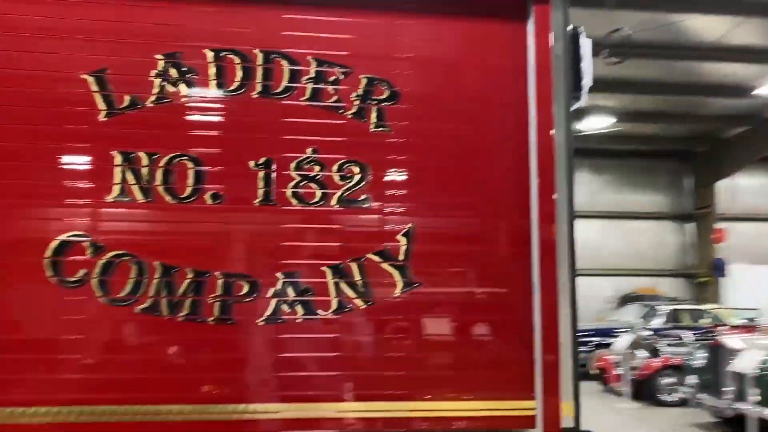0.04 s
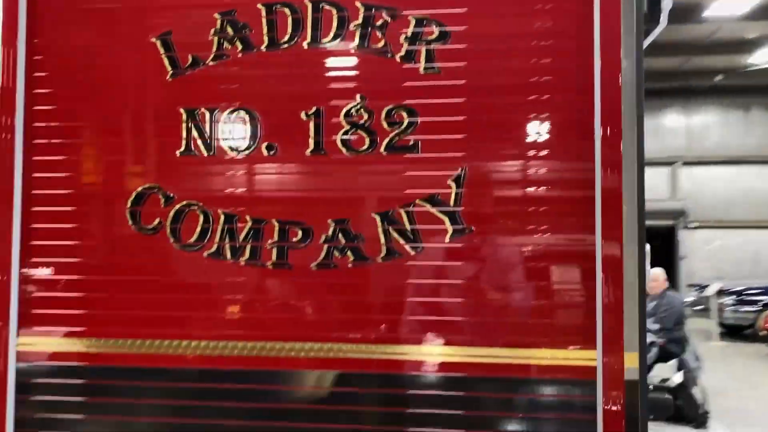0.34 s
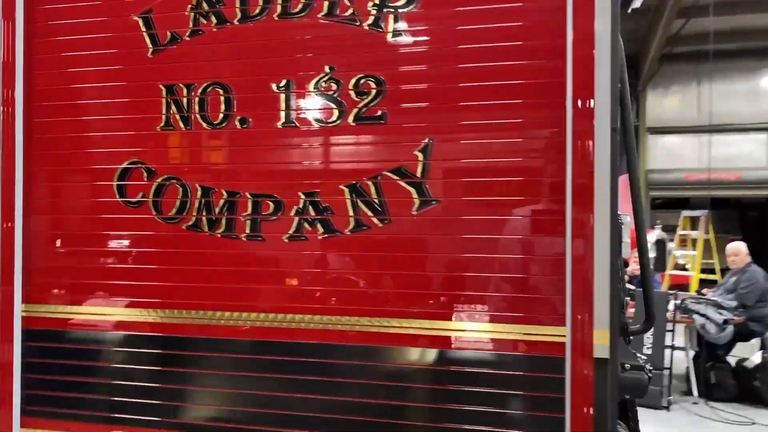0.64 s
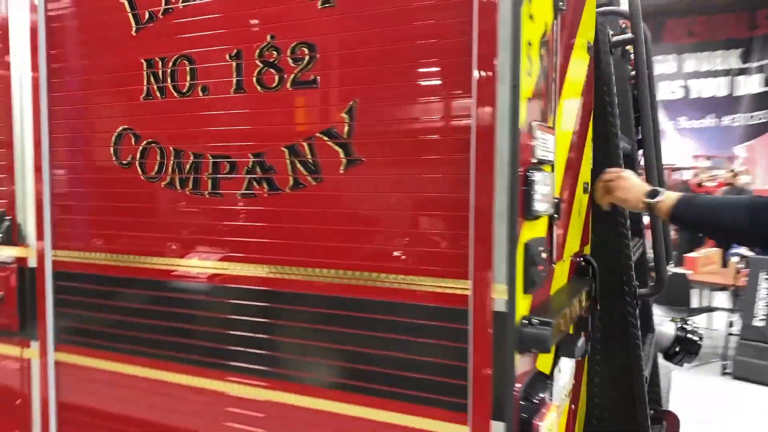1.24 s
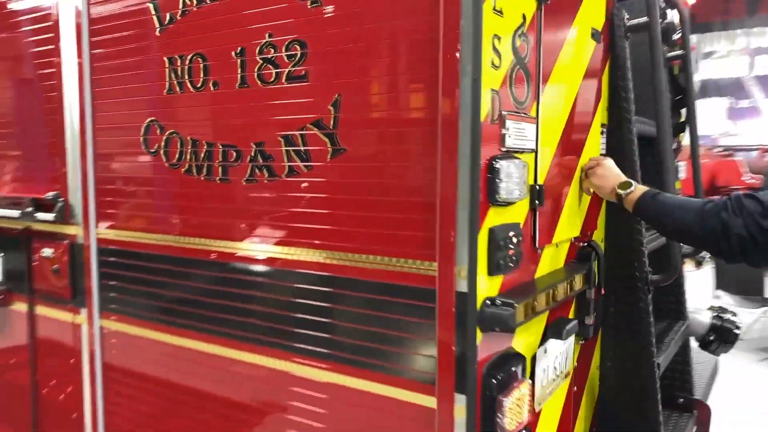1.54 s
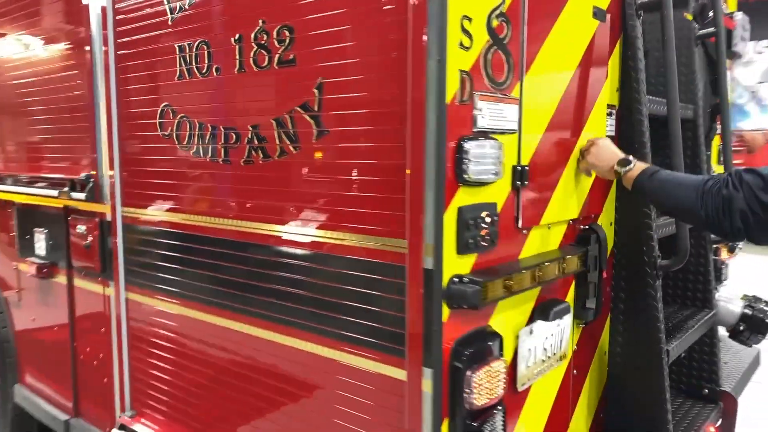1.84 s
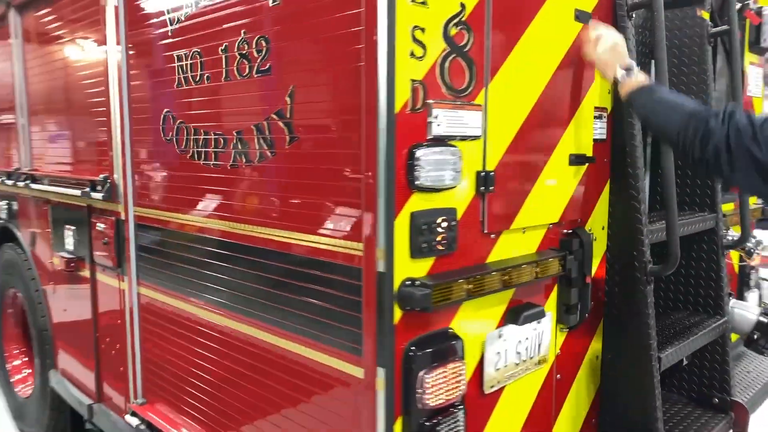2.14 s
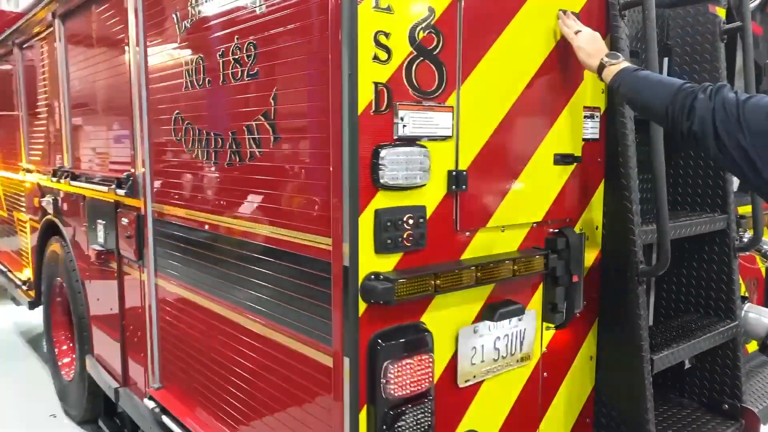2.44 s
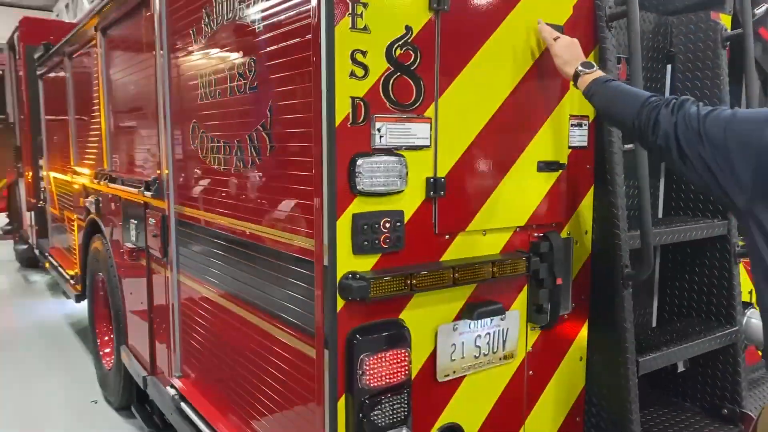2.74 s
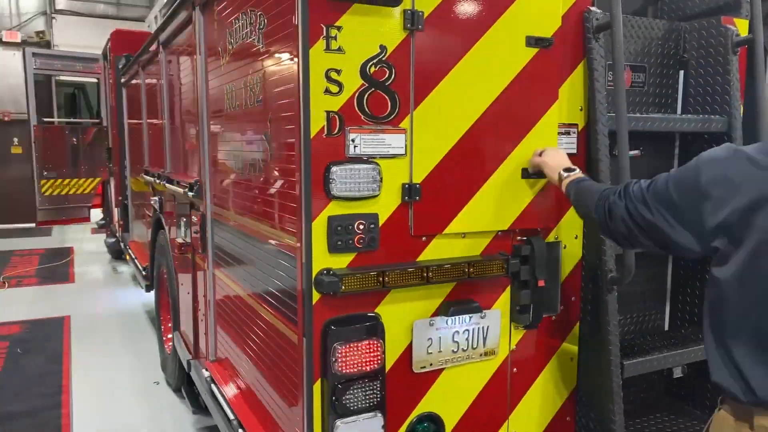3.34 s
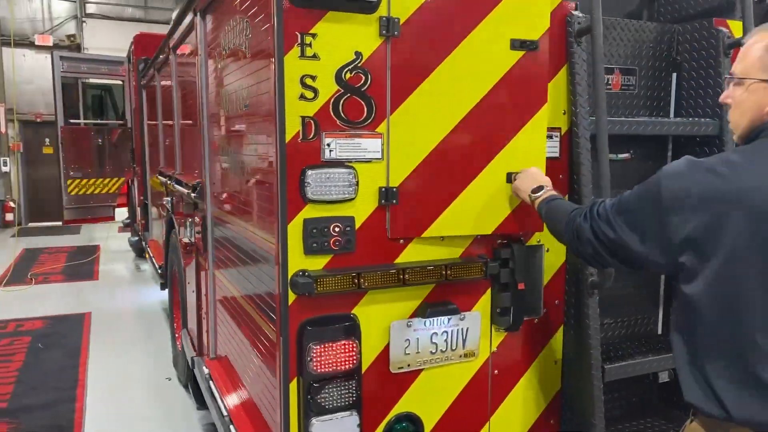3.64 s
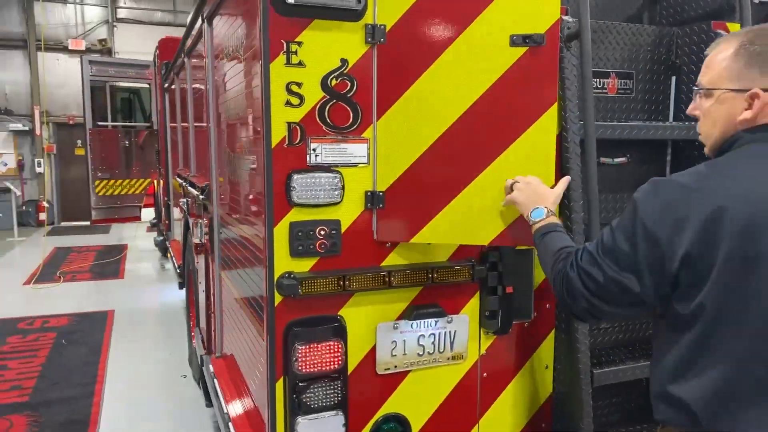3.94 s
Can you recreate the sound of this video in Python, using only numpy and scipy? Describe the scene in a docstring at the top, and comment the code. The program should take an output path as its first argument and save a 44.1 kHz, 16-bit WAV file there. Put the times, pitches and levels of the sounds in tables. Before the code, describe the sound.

Loud, close metal clacks ring through a large garage as a hand springs two truck door latches, one after the other. The freed door gives a low boom, then the handle is knocked over a low drone and ventilation hum.

```python
"""Ventilation, a low hum and a soft rustle fill a large garage, and something bumps the bodywork.
A hand works the two heavy latches of a truck's sheet-metal compartment door: each clicks, springs open
with a clack and rebounds, ringing the metal around it. The freed door booms, a low drone swells,
and the hand knocks on the lower latch's handle.
The hall rings on after each blow, and the loudest clacks overload the close microphone."""
import sys
import numpy as np
from scipy import signal
from scipy.fft import rfft, irfft
from scipy.io import wavfile
from scipy.ndimage import uniform_filter1d

SR = 44100
rng = np.random.default_rng(int(sys.argv[2]) if len(sys.argv) > 2 else 0)


def output_pcm(signal):
    """Save a mono or channel-first signal as 16-bit PCM at the path in sys.argv[1].

    Samples are clipped to [-1, 1] before scaling.
    """
    pcm = np.clip(np.atleast_2d(signal).T, -1, 1) * 32767
    wavfile.write(sys.argv[1], SR, np.round(pcm).astype(np.int16))


N = 176400
T = np.arange(N) / SR

# blows on the two latches and the handle
# (time [s], level [dB], treble tilt [dB/octave], low thump [dB], rise [ms], crack t60 at 2 kHz [s])
LOWER_HITS = [(1.7228, -2, 1.5, -1.5, 4, 0.032), (1.7642, 3.5, 1.4, 1.5, 0.64, 0.016),
              (1.8212, -4, -.5, -5.5, 2.8, 0.048)]
UPPER_HITS = [(2.9280, -7, 1.5, 4.5, 1.04, 0.026), (2.9688, 2, 0.21, -2.5, 0.27, 0.054),
              (3.0105, -11.5, 1.1667, 4.5, .5, 0.063), (3.1050, -13.5, 2.04, -8, 0.72, .04)]
HANDLE_HITS = [(3.466, -43.5, -1.6, 8.5, 5, 0.053), (3.557, -35, -0.37, 9, 2.4, 0.077),
               (3.5715, -17.5, 0.25, -1, 2.1, 0.048), (3.591, -33, 1, -17, 1.5, 0.07)]
# ringing tones of each part, plus a faint, very high 14.7 kHz tone on each latch blow
# (frequency [Hz], level [dB], t60 [s])
LOWER_TONES = [(178.2, -16.5, 0.37), (531, -23.5, 0.25), (719, -21, 0.22), (1060, -18, .15),
               (1560, -17, 0.06), (2135, -44.5, 0.21), (2430, -7, .05), (2794, -14, 0.077),
               (2760, -10, 0.12), (2980, -15, 0.06), (4260, -27, 0.17), (8150, -17, 0.11),
               (14700, -39, .13)]
UPPER_TONES = [(166.6, -17, 0.23), (239.7, -20.5, 0.42), (385.4, -16.5, 0.29), (599, -16.5, 0.17),
               (1087, -17, 0.25), (1606, -16.5, 0.24), (2390, -13, 0.047), (2660, -18, 0.059),
               (2716, -13.5, .11), (3150, -19, 0.34), (3464, -13.5, .06), (5470, -10.5, 0.053),
               (8130, -32, 0.27), (14700, -38, .15)]
HANDLE_TONES = [(164, -12.5, 0.31), (354, -18.5, 0.27), (610, -9, 0.086), (794, -10, 0.063),
                (2005, 4, 0.057), (4280, -28, 0.21)]
# clatter of the metal around each part (frequency [Hz], spectral level [dB])
LOWER_COLOUR = [(60, -16.5), (180, -10), (350, -10), (600, -8), (1100, -7.5), (1700, -8.5), (2100, 2),
                (2900, -1.5), (3800, -14.5), (6000, -16), (8300, -17.5), (10000, -35.5), (13000, -37),
                (14700, -26), (16000, -49)]
UPPER_COLOUR = [(60, -20.5), (180, -12), (400, -6.5), (700, -4), (1100, -2.5), (1800, -5.5), (2500, 3),
                (3400, -1), (4400, -16), (5800, -8), (8600, -6.5), (10200, -30), (13000, -28.5),
                (14500, -20), (16000, -34)]
HANDLE_COLOUR = [(100, -0.5), (450, -13), (800, 5), (1200, -9.5), (2100, 3), (3400, -6), (4700, -25),
                 (8000, -27), (11000, -54), (16000, -45)]
# soft bumps on the bodywork (time [s], level [dB], panel mode [Hz])
BUMPS = [(1.03, -30, 236), (1.113, -47, 940), (2.664, -29, 656)]
# the hall's reverb send (frequency [Hz], level [dB])
HALL_SEND = [(100, -14), (200, -10), (400, -13.5), (800, -14.5), (1400, -14), (2000, -13.5), (2700, -10),
             (4200, -9), (6000, -14), (8500, -20.5), (14000, -21.5)]
# the hall's tail (frequency [Hz], t60 [s])
HALL_T60 = [(100, 2.4), (500, 0.89), (1400, 0.87), (2700, 0.98), (5000, 0.93), (8000, 0.77), (14000, 0.2)]
# tone of the noise beds (frequency [Hz], spectral level [dB])
AIR_COLOUR = [(20, -30), (30, -8), (40, -4.5), (54, 5), (72, -0.5), (92, -6), (133, -6.5), (150, -12),
              (245, -13.5), (490, -25.5), (770, -29.5), (1540, -28), (5000, -40.5), (12100, -47),
              (14000, -37), (15500, -39.5)]
RUSTLE_COLOUR = [(200, -20), (700, 7), (1600, 5.5), (3500, 0), (8000, -7.5), (14000, -21)]
# fader rides of the background layers (time [s], level [dB])
RUSTLE_LEVEL = [(0, -48.5), (.12, -50.5), (.26, -55.5), (.35, -50), (.46, -58), (.6, -49), (.76, -50.5),
                (1.1, -56), (1.35, -56.5), (1.5, -50), (1.7, -70), (3.5, -60.5), (3.8, -53.5), (4, -56.5)]
MAINS_LEVEL = [(0, -46.5), (1.2, -43.5), (2.8, -48.5), (3.6, -50), (4, -50.5)]
DRONE_LEVEL = [(0, -64), (2.9, -57), (3.1, -30), (3.28, -30), (4, -28)]
# the drone's partials (frequency ratio [1], level [dB])
DRONE_PARTIALS = [(1, -2), (1.74, -10), (4, -21)]


def latch(hits, tones, colour, tones_db=-2, panel_db=-11, panel_t60_s=0.17):
    """Each blow is a short crack, the panel's dense ring and a set of ringing tones."""
    out, t, f = np.zeros(N), T[:SR // 2], freqs(SR)
    for start, db, tilt_db, thump_db, rise_ms, crack_t60 in hits:
        ring = 0
        for hz, tone_db, t60 in tones:
            ring += undb(tone_db + tones_db) * np.sin(2 * np.pi * (hz * t + rng.random())) * fade(t, t60)
        for hz, band in bands(noise(colour, len(t))):
            decay_scale = (2000 / hz) ** 0.33  # treble dies sooner
            crack = fade(t, crack_t60 * decay_scale)
            panel = undb(panel_db) * fade(t, panel_t60_s * decay_scale)
            ring += band * (crack + panel)
        eq_db = tilt_db * np.log2(np.clip(f, 500, 9000) / 2500) + thump_db / (1 + (f / 450) ** 2)
        clack = irfft(rfft(ring, SR) * undb(eq_db), SR)[:len(t)]
        attack = np.minimum(t / (rise_ms / 1000), 1)
        add(out, start, undb(db) * attack * clack)
    return out


def door_boom(start_s=2.94, hz=63, db=-20.5, t60_s=2.1, rise_s=0.02):
    """The freed door swings in its lowest mode."""
    out = np.zeros(N)
    envelope = fade(T, t60_s) * np.minimum(T / rise_s, 1)
    add(out, start_s, undb(db) * np.sin(2 * np.pi * hz * T) * envelope)
    return out


def bumps(t60_s=0.089, rise_s=0.0032, tone_db=-3):
    """Dull, short contacts with the bodywork: a thud around one panel mode."""
    out, t = np.zeros(N), T[:SR // 4]
    for start, db, hz in BUMPS:
        colour = [(hz / 4, -16), (hz / 1.4, -11), (hz, 0), (hz * 1.1, -10),
                  (hz * 2, -14), (hz * 4, -32), (hz * 20, -60)]
        thud = noise(colour, len(t)) / 2 + undb(tone_db) * np.sin(2 * np.pi * hz * t)
        add(out, start, undb(db) * thud * fade(t, t60_s) * np.minimum(t / rise_s, 1))
    return out


def hall(x, build_s=0.02, far_wall_s=0.147, far_wall_db=-2):
    """The hall stores each band's energy and lets it go as a wash, with a slap off the far wall."""
    t = T[:SR * 3 // 2]
    slap = undb(far_wall_db) * (t > far_wall_s) * fade(abs(t - far_wall_s), t60=0.087)
    swell = np.minimum(t / build_s, 1) * (1 + slap)
    out = 0
    for (hz, band), (_, wash) in zip(bands(x), bands(rng.standard_normal(N))):
        decay = (swell * fade(t, lookup(HALL_T60, hz))) ** 2
        energy = np.abs(signal.fftconvolve(band ** 2, decay / decay.sum())[:N])
        out += undb(lookup(HALL_SEND, hz)) * np.sqrt(energy) * wash / wash.std()
    return out


def drone(hz=48.1, drift=0.00748, waver_db=3.5):
    """A low, wavering drone that swells after the second latch."""
    phase = 2 * np.pi * np.cumsum(hz * (1 + drift * wander(5))) / SR
    tone = sum(undb(db + waver_db * wander(9)) * np.sin(ratio * phase) for ratio, db in DRONE_PARTIALS)
    return np.sqrt(2) * fader(DRONE_LEVEL) * tone


def ventilation(db=-39.5):
    """A steady bed of ventilation rumble, with microphone hiss on top."""
    return undb(db) * noise(AIR_COLOUR, N)


def mains_hum(hz=117.5, waver_db=3.5):
    """Mains hum: one low tone whose level wavers."""
    return np.sqrt(2) * fader(MAINS_LEVEL) * np.sin(2 * np.pi * hz * T) * undb(waver_db * wander(5.2))


def rustle(flutter_db=4.5):
    """A soft midrange rustle that comes and goes."""
    return fader(RUSTLE_LEVEL) * noise(RUSTLE_COLOUR, N) * undb(flutter_db * wander(25))


def squeak(start_s=2.46, length_s=0.13, from_hz=9000, to_hz=7500, db=-68):
    """A faint, thin whistle that slides down."""
    out, hz = np.zeros(N), np.linspace(from_hz, to_hz, int(length_s * SR))
    whistle = np.sin(2 * np.pi * np.cumsum(hz) / SR)
    add(out, start_s, undb(db) * whistle * np.sqrt(np.hanning(len(hz))))
    return out


def undb(db):
    """Decibels to gain."""
    return 10 ** (np.asarray(db) / 20)


def lookup(table, hz):
    """Read a table on a log-frequency axis."""
    f, values = np.array(table, float).T
    return np.interp(np.log(hz + 1e-9), np.log(f), values)


def fader(table):
    """Gain over time from (time [s], level [dB]) points."""
    return undb(np.interp(T, *np.array(table, float).T))


def freqs(size):
    """Frequencies of a spectrum's bins."""
    return np.arange(size // 2 + 1) * SR / size


def noise(colour, size):
    """Coloured noise of rms 1."""
    phases = np.exp(2j * np.pi * rng.random(size // 2 + 1))
    y = irfft(phases * undb(lookup(colour, freqs(size))), size)
    return y / y.std()


def fade(t, t60):
    """Exponential decay, 60 dB down at t60."""
    return np.exp(-np.log(1000) * t / t60)


def bands(x):
    """Split a sound into overlapping half-octave bands: (centre [Hz], signal)."""
    centres = 62.5 * 2 ** (np.arange(17) / 2)
    spectrum, f = rfft(x), freqs(len(x))
    return [(c, irfft(spectrum * lookup(list(zip(centres, centres == c)), f), len(x))) for c in centres]


def wander(rate_hz):
    """Smooth random modulation, spread near 1."""
    hold = int(SR / rate_hz)
    steps = np.repeat(rng.standard_normal(N // hold + 2), hold)
    return uniform_filter1d(uniform_filter1d(steps, hold), hold)[:N]


def add(out, start, x):
    """Mix a sound in at a time."""
    i = int(start * SR)
    out[i:i + len(x)] += x[:N - i]


def scene():
    """The latches and door up close, the hall and its background behind them."""
    door = (latch(LOWER_HITS, LOWER_TONES, LOWER_COLOUR)
            + latch(UPPER_HITS, UPPER_TONES, UPPER_COLOUR)
            + latch(HANDLE_HITS, HANDLE_TONES, HANDLE_COLOUR)
            + bumps())
    mix = door + hall(door) + door_boom() + ventilation() + rustle() + mains_hum() + drone() + squeak()
    return mix[None]


def record(dry, clip_level=0.98, top_hz=15700):
    """The loudest clacks overload the microphone, and a steep low-pass cuts the top."""
    lowpass = signal.ellip(8, .2, 70, top_hz, fs=SR, output="sos")
    return signal.sosfilt(lowpass, np.clip(dry, -clip_level, clip_level))


dry = scene()
out = record(dry)
output_pcm(out)
```